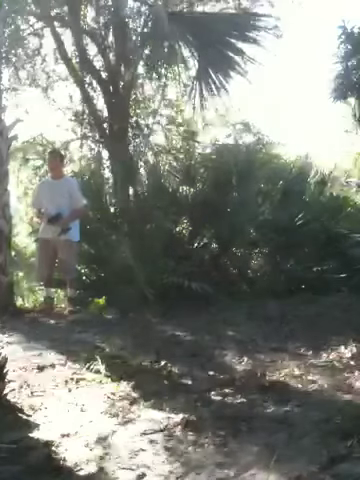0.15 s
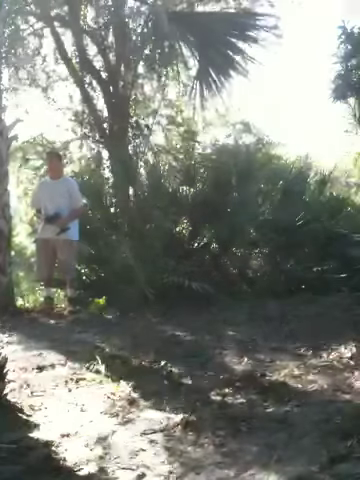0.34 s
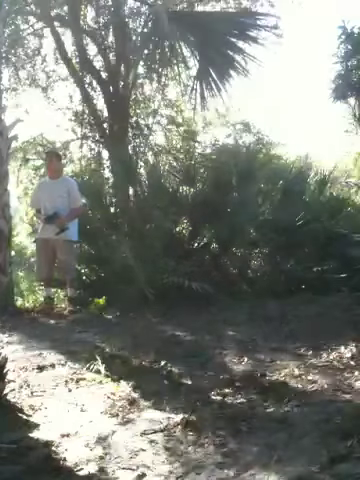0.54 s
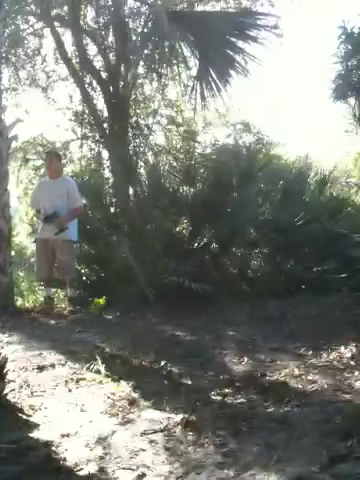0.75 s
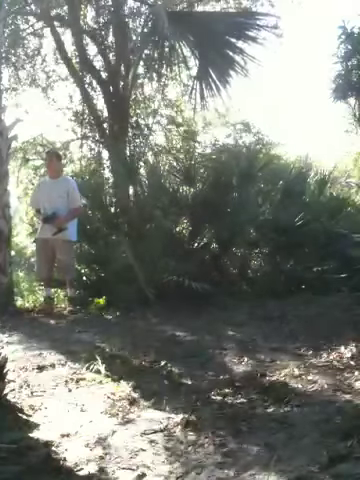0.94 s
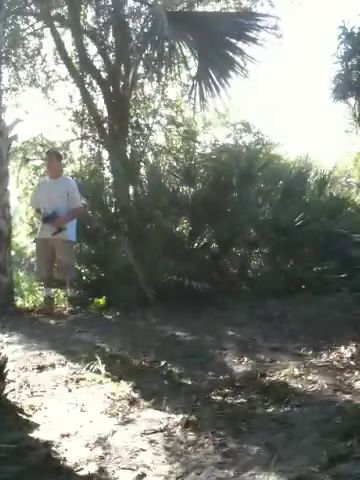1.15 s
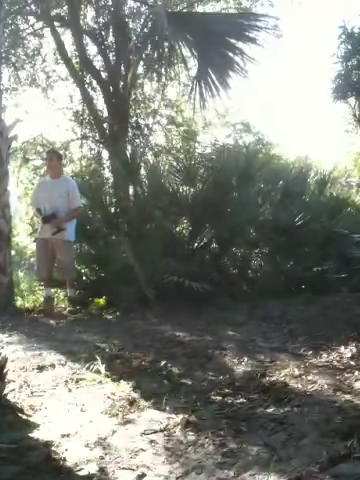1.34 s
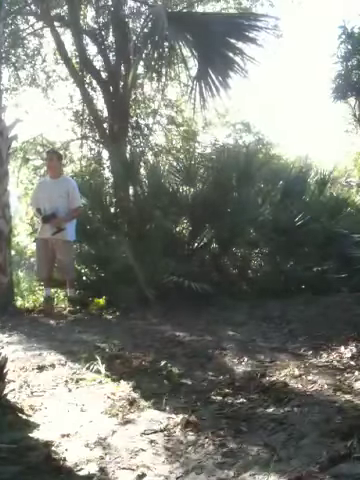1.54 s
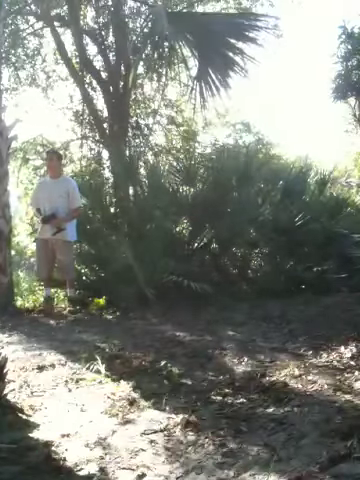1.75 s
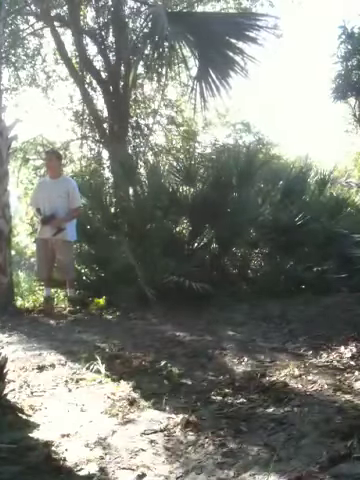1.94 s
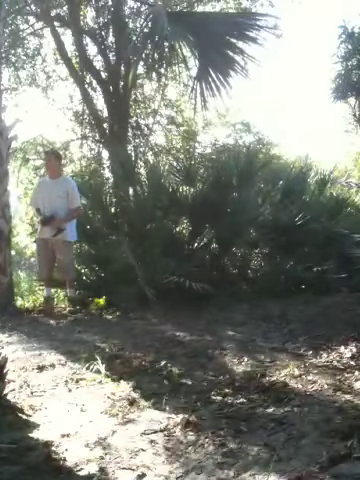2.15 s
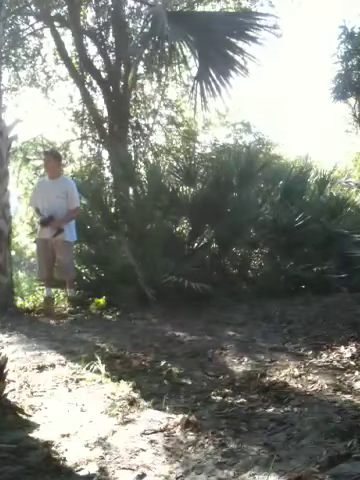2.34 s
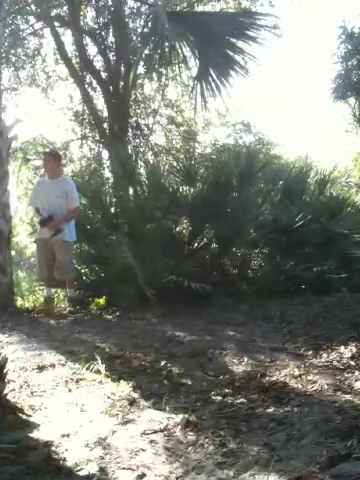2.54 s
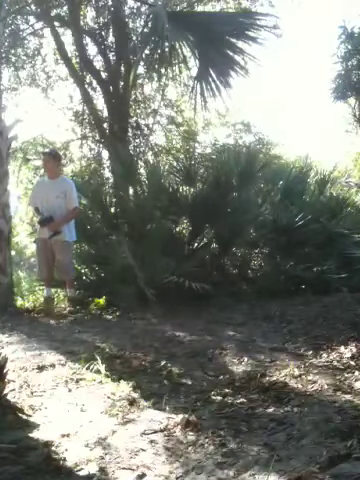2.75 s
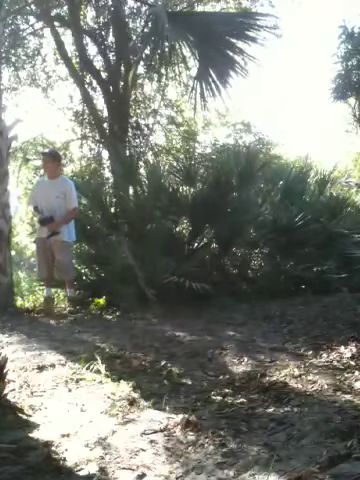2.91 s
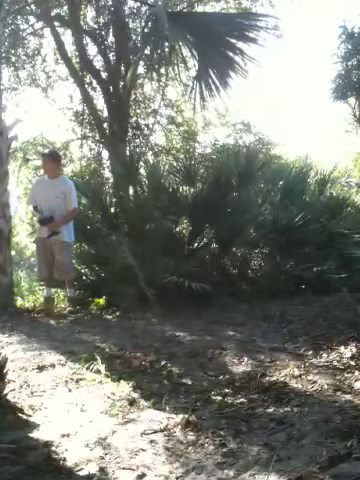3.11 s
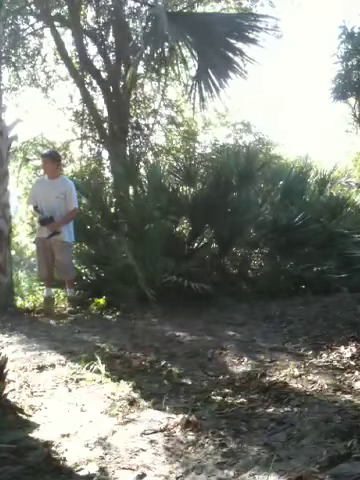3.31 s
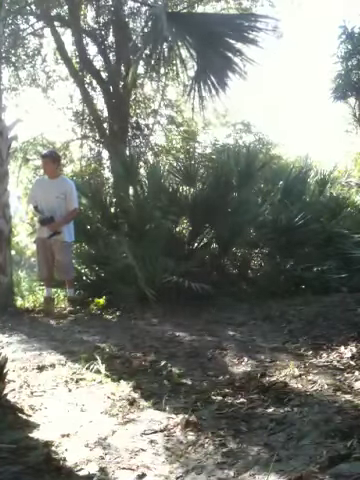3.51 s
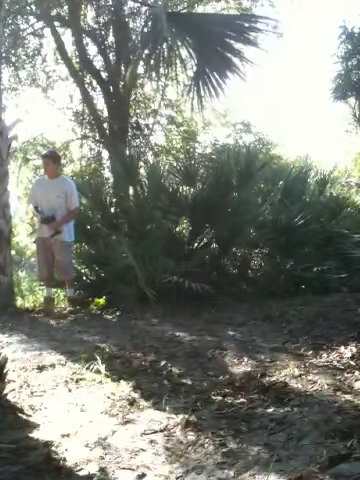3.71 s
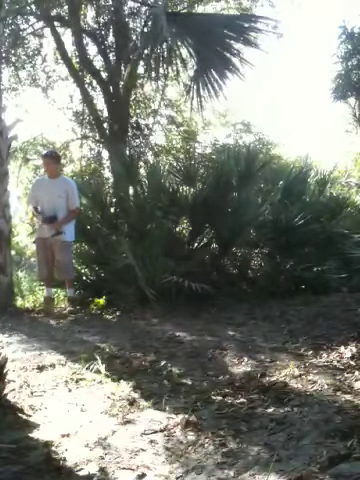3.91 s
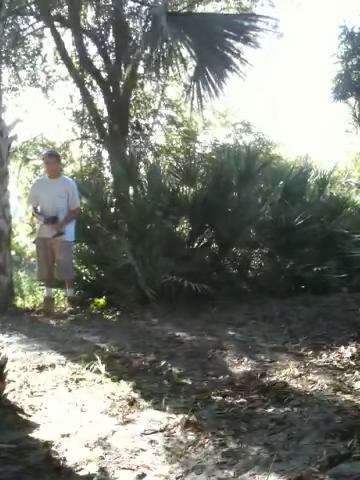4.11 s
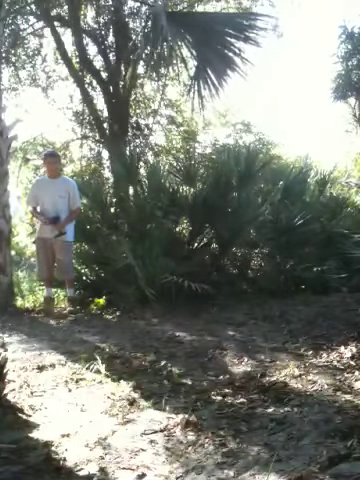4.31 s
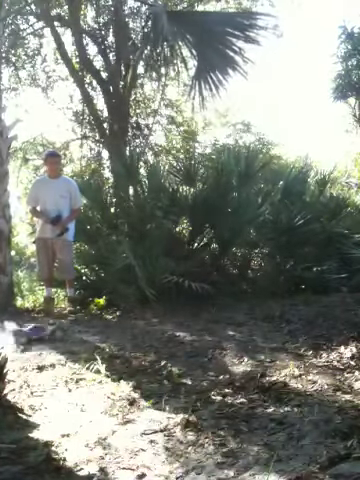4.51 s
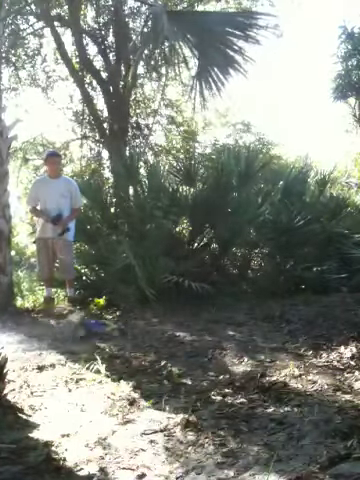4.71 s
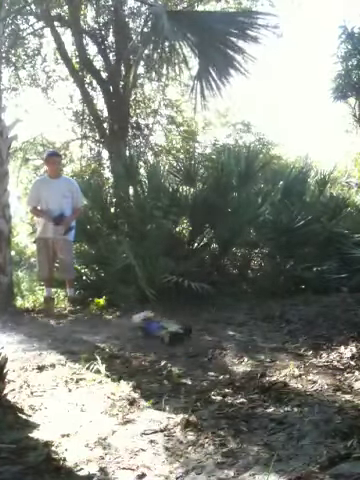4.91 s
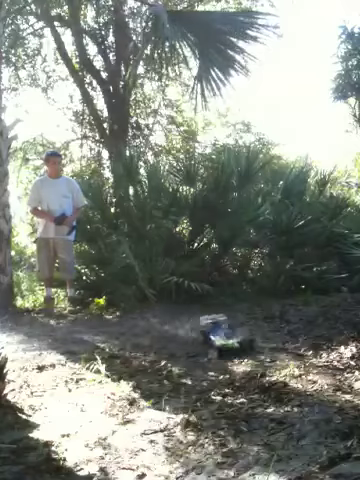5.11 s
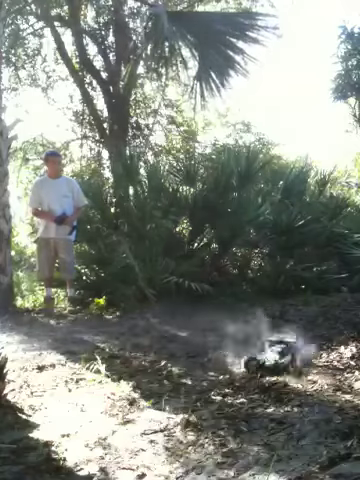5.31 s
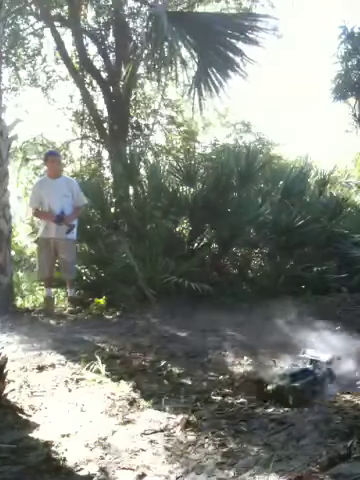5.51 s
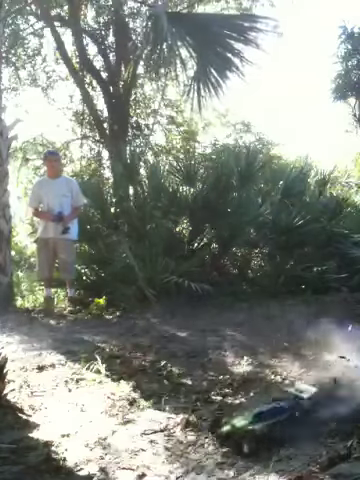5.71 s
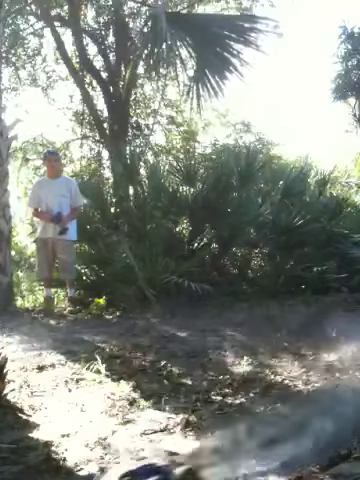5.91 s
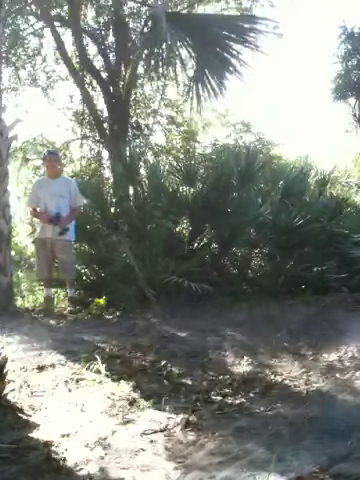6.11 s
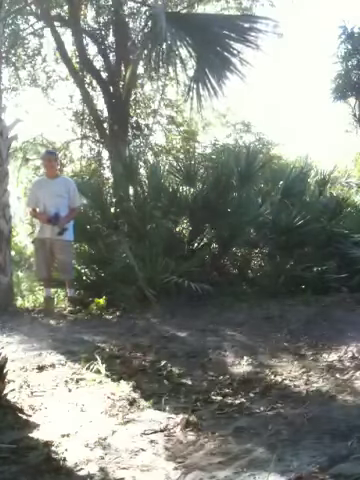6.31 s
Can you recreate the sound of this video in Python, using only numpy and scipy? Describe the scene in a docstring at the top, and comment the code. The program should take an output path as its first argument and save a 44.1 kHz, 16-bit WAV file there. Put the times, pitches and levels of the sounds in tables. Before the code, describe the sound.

Raspy, high-pitched whine of a small fuel-powered toy car, blipping up and down over a rough burble, with faint tyre scrabble on dirt.

```python
"""A dirt yard ringed by bushes: a nitro model buggy drives round on throttle blips over an uneven cruise.
Each blip swings the engine above its cruising speed, and every part of the exhaust grows with that effort.
Each firing of its tiny two-stroke sends a pressure pulse and a spurt of gas through the tuned pipe,
which rings at a low, a middle and a high resonance. Tyres scrabble faintly below.
The loudest revs overload a small microphone, alike in both channels."""
import sys
import numpy as np
from scipy import signal
from scipy.fft import rfft, irfft
from scipy.io import wavfile
from scipy.ndimage import uniform_filter1d

SR = 44100
rng = np.random.default_rng(int(sys.argv[2]) if len(sys.argv) > 2 else 0)


def pcm_store(signal):
    """Save signal as 16-bit PCM."""
    levels = np.round(np.clip(np.atleast_2d(signal), -1, 1) * 32767)
    wavfile.write(sys.argv[1], SR, levels.astype(np.int16).T)


N = 280035

# running state: (time [s], roughness of firing before load steadies it [factor],
# low pipe resonance before load and waver [Hz], mean level of the tyres [dB])
RUNNING = [(0, 0.9, 1692, -31.5), (2.4, 1.08, 1669, -37.5), (2.75, 0.64, 1644, -40.5),
           (3.25, 0.96, 1606, -31), (3.45, 0.4, 1687, -43.5), (5.45, 0.32, 1618, -36.5),
           (5.95, 0.69, 1728, -25.5), (6.22, 0.83, 1469, -35.5), (6.35, 0.3, 1623, -29)]


def engine():
    """Firings drive the low orders, the bark, the pipe and the rasp; all grow with effort."""
    # drive and turns: (time [s], level of the whole exhaust [dB], level of its treble [dB])
    path = [(0.0, 6, -1.4), (0.34, 0, 3.4), (0.61, 1.5, 3), (1.0, 3.5, 1), (1.36, -3.4, 6), (1.56, 3, 1.5),
            (1.73, 0, 0.5), (2.02, 1, 0.4), (2.36, -2.5, 4), (3.27, -3.7, -2.5), (3.5, -6.5, -2),
            (3.65, 0.6, -5.5), (3.84, -1, -4), (4.79, -2, -2.5), (5.1, 2.5, -6), (5.49, -4, 5),
            (5.95, 1, 3), (6.35, 6.5, -6.5)]
    whole_db, treble_db = in_time(path)
    hz = speed()
    effort = effort_at(hz)

    # load is read from the revs: under load the burn is steadier
    load = np.clip((hz - 215) / 55, 0, 1)
    rough = in_time(RUNNING)[0] * (1 - 0.78 * load)
    turns = np.cumsum(hz * (1 + 0.00986 * rough * drift(70))) / SR
    pulses, strength = firings(turns, uneven_db=1.6 + 0.82 * rough, jitter_s=0.000006 + 0.00005 * rough)
    gas = spurts(turns, strength, open_share=1.0, leak=0.19)
    hiss = rough * gas

    tone = low_orders(turns, hz, effort, strength)
    tone = tone + bark(pulses, hiss, hz, effort, treble_db)
    tone = tone + pipe(pulses, hiss, load, effort, treble_db)
    rasp_db = level(effort, usual_db=-21, db_per_octave=24) + whole_db + treble_db
    exhaust = from_db(whole_db) * tone + rasp(gas, rasp_db)

    # off the throttle the level burbles, as firings come in lumps
    burble_db, burbles_per_s = 1.48, 83
    return from_db(burble_db * rough * drift(burbles_per_s)) * exhaust


def speed():
    """Firings per second: each blip swings the engine up from its cruising speed and lets it run down."""
    # held throttle: (time [s], speed between blips [firings/s])
    cruise = [(-0.003, 194.0), (1.315, 211.0), (1.733, 191.0), (1.886, 230.0), (2.13, 232.0),
              (2.484, 209.0), (2.727, 245.0), (3.164, 247.0), (3.434, 172.0), (3.786, 223.0),
              (4.344, 236.0), (4.815, 219.0), (5.221, 251.0), (5.365, 290.0), (5.573, 302.0),
              (5.729, 327.0), (5.985, 278.0), (6.164, 180.0)]
    # throttle blips: (time of the peak [s], extra speed [firings/s], rise [s], fall [s])
    blips = [(0.175, 141.0, 0.083, 0.097), (0.568, 129.0, 0.092, 0.072), (0.816, 78.0, 0.087, 0.122),
             (1.051, 79.0, 0.057, 0.084), (1.551, 83.0, 0.074, 0.119), (2.043, 34.0, 0.079, 0.05),
             (3.196, 29.0, 0.023, 0.124), (3.663, 66.0, 0.084, 0.095), (4.449, 47.0, 0.09, 0.096),
             (4.964, 75.0, 0.063, 0.07), (5.27, 28.0, 0.029, 0.097), (5.89, 54.0, 0.065, 0.127)]
    hz, = in_time(cruise)
    t = np.arange(N) / SR
    for peak_s, extra_hz, rise_s, fall_s in blips:
        away = (t - peak_s) / np.where(t < peak_s, rise_s, fall_s)
        hz = hz + extra_hz * np.exp(-np.minimum(away ** 2, 20))
    return hz


def effort_at(hz, usual_hz=250, full_power_hz=292.3):
    """Effort in octaves of speed above the usual, with a soft ceiling at full power."""
    capped = hz / (1 + (hz / full_power_hz) ** 16) ** (1 / 16)
    return np.log2(capped / usual_hz)


def level(effort, usual_db, db_per_octave):
    """Decibels that effort gives one part of the exhaust, usual_db being its level at the usual speed."""
    return usual_db + db_per_octave * effort


def firings(turns, uneven_db, jitter_s):
    """One pulse a turn, each a little off in strength and time; also the strength held through the turn."""
    count = np.floor(turns).astype(int)
    at = np.flatnonzero(np.diff(count))
    chance = rng.standard_normal((N, 2))[:len(at)]
    strength = from_db(uneven_db[at] * np.minimum(chance[:, 0], 2))
    crossing = np.interp(count[at + 1], turns, np.arange(N))
    exact = crossing + jitter_s[at] * SR * chance[:, 1]
    # a short sinc places each pulse between samples
    pulses = np.zeros(N)
    for tap in range(-3, 5):
        index = np.clip(exact.astype(int) + tap, 0, N - 1)
        pulses[index] += strength * np.sinc(index - exact)
    held = strength[np.clip(count - 1, 0, len(at) - 1)]
    return even(pulses), held


def spurts(turns, strength, open_share, leak):
    """Turbulent gas bursts out as the exhaust port opens and weakens through the turn, over a steady leak."""
    burst = np.exp(-(turns % 1) / open_share)
    return even(rng.standard_normal(N) * strength * (leak + burst))


def low_orders(turns, hz, effort, strength):
    """The firing tone and its octave, swelling with the strength of the firings."""
    # firing tone against the rest: (time [s], level [dB])
    first_fade = [(0.0, -2.5), (0.12, 8), (0.6, 6), (0.98, 5.5), (1.42, 2.8), (1.58, 16.5), (1.72, -6.5),
                  (1.94, 2.5), (2.01, -3.5), (2.82, 7), (3.23, -10), (3.43, -2.5), (3.86, 0.3), (4.87, 2),
                  (5.1, -7), (5.45, 6), (6.01, 4.7), (6.35, -6)]
    # its octave against the rest: (time [s], level [dB])
    second_fade = [(0.0, -3), (0.15, 2.0), (0.2, -9.9), (0.51, 9.5), (0.57, -1.5), (1.0, 3.4), (1.22, -2.5),
                   (1.74, -0.7), (2.7, 7.5), (2.82, -2.5), (3.27, 11), (3.41, -24), (3.59, 7), (3.88, -12),
                   (4.12, 1), (5.1, 10.5), (5.79, 4), (6.35, -11.5)]
    first_db, = in_time(first_fade)
    second_db, = in_time(second_fade)
    first_db = first_db + level(effort, usual_db=-28, db_per_octave=21.7)
    second_db = second_db + level(effort, usual_db=-33.5, db_per_octave=13.6)

    # the firing tone hollows out as it sweeps through one pitch
    hollow_hz, hollow_width_hz, hollow_db = 276.3, 21, 14.5
    dip_db = hollow_db / (1 + ((hz - hollow_hz) / hollow_width_hz) ** 2)
    first = from_db(first_db - dip_db) * np.sin(2 * np.pi * turns)
    second = from_db(second_db) * np.cos(4 * np.pi * turns)
    swell = even(uniform_filter1d(strength, size=400))
    return np.sqrt(2) * swell * (first + second)


def bark(pulses, hiss, hz, effort, treble_db):
    """The pressure pulse itself, harder while the engine picks up, and the snarl of its steep front."""
    # colour of the exhaust pulse: (frequency [Hz], level [dB])
    bark_colour = [(380, -39.5), (520, -1.5), (800, 4), (1000, 1), (1200, 4), (1400, 1), (6000, -41)]
    # colour of its steep front: (frequency [Hz], level [dB])
    snarl_colour = [(1100, -23.5), (2200, 9), (2550, 3.5), (3200, -1), (4000, -6.5), (5500, -20.5)]
    # bark against the rest: (time [s], level [dB])
    bark_fade = [(0, -7), (0.2, 2), (0.62, -1.5), (0.8, 0), (1.25, -4), (1.52, 0.5), (1.72, -6.5), (2.0, 1),
                 (2.5, -2), (3.25, 3.5), (3.8, -4.5), (4.3, 2.5), (4.47, -6.5), (4.62, -1), (5.5, 2),
                 (5.97, 2.5), (6.06, -5), (6.35, -1)]
    # snarl against the rest: (time [s], level [dB])
    snarl_fade = [(0, -0.5), (0.7, 2), (1.3, 5.5), (1.75, 2), (2.05, -0.5), (2.75, -4.5), (3.4, -6),
                  (4.1, -2), (4.75, 5), (5.0, -2), (5.72, -1), (5.95, 4.5), (6.2, 9), (6.35, 6)]
    bark_db, = in_time(bark_fade)
    snarl_db, = in_time(snarl_fade)

    # the surge is in full from this acceleration on
    surge_db, full_surge_hz_per_s = 3, 1400
    surge = np.clip(np.gradient(hz) * SR / full_surge_hz_per_s, 0, 1)
    bark_db = bark_db + level(effort, usual_db=-27.5, db_per_octave=12.4) + surge_db * surge
    snarl_db = snarl_db + level(effort, usual_db=-31.5, db_per_octave=29) + treble_db

    body = even(yard(colour(pulses + 0.058 * hiss, bark_colour), scatter_db=3.5))
    front = even(yard(colour(pulses + 0.55 * hiss, snarl_colour), scatter_db=-3))
    return from_db(bark_db) * body + from_db(snarl_db) * front


def pipe(pulses, hiss, load, effort, treble_db):
    """Three resonances of the tuned pipe; hotter gas under load raises the low and the high one."""
    # how far they stand out: (time [s], low resonance [dB], middle and high resonances [dB])
    ringing = [(0.0, -0.8, -0.2), (0.54, 0.7, 5.5), (0.87, -2.5, 3.5), (1.35, 7.4, 2.5), (1.53, -1.5, 0),
               (2.07, -2.5, 1.3), (2.48, 5, 2.5), (2.65, -4, -5), (3.07, 1.5, -10), (4.11, -10, -0.5),
               (4.39, -2.7, -18), (4.48, -8.5, -1), (4.97, -0.5, -7), (5.75, 1.5, 3), (5.89, 13, 3.5),
               (6.07, -1.3, 1), (6.35, -1.5, 7.8)]
    # middle resonance against the rest: (time [s], level [dB])
    middle_fade = [(0, -4), (0.5, 1.5), (1.4, 1), (2.2, 3.5), (3.1, 0), (3.7, -4), (4.3, -9), (5.15, 10.5),
                   (5.35, -5.5), (6.35, -13)]
    low_db, high_db = in_time(ringing)
    middle_db, = in_time(middle_fade)
    low_db = low_db + level(effort, usual_db=-22.5, db_per_octave=14.2)
    middle_db = middle_db + high_db + treble_db + level(effort, usual_db=-36, db_per_octave=22.5)
    high_db = high_db + treble_db + level(effort, usual_db=-25, db_per_octave=20.4)

    # off the throttle the low resonance wavers from one lump of firings to the next
    waver_hz, wavers_per_s = 32, 52
    roughness, low_hz, _ = in_time(RUNNING)
    low_hz = low_hz + waver_hz * roughness * (1 - load) * drift(wavers_per_s) + 70 * load
    middle_hz = np.full(N, 3745)
    high_hz = 6550 + 330 * load

    low = resonate(pulses + 0.78 * hiss, low_hz, width_hz=59, skirt_hz=910)
    middle = resonate(pulses + 0.15 * hiss, middle_hz, width_hz=370, skirt_hz=1100)
    high = resonate(pulses + 2 * hiss, high_hz, width_hz=190, skirt_hz=1340)
    low_ring = from_db(low_db) * even(yard(low, scatter_db=0))
    middle_ring = from_db(middle_db) * even(yard(middle, scatter_db=3))
    high_ring = from_db(high_db) * even(yard(high, scatter_db=-3))
    return low_ring + middle_ring + high_ring


def rasp(gas, rasp_db):
    """The escaping gas; a stronger jet is also a brighter one and throws a fine spray on top."""
    # colour of the escaping gas: (frequency [Hz], level [dB])
    rasp_colour = [(1000, -22.5), (3200, -4.5), (3900, -1.5), (5100, -13), (6200, 0.5), (7400, 1),
                   (8200, 5), (8900, -4), (9700, -4), (11200, -11), (15500, -34)]
    # colour of the spray: (frequency [Hz], level [dB])
    spray_colour = [(7000, -54), (10500, 18), (12500, 12.5), (15500, -30.5)]
    # spray_db is the spray beside a rasp of usual_db; spray_growth is dB gained per dB of rasp
    usual_db, spray_db, spray_growth = -22, -44, 2.5
    excess_db = rasp_db - usual_db
    # the difference from sample to sample is a brighter copy of the gas
    jet = gas + from_db(excess_db - 2.5) * np.diff(gas, prepend=0)
    spray = from_db(spray_db + spray_growth * excess_db) * even(colour(gas, spray_colour))
    return from_db(rasp_db) * even(yard(colour(jet, rasp_colour), scatter_db=6)) + spray


def tyres():
    """Knobbly tyres scrabble over dirt and leaves: coloured noise with a fluttering level."""
    # colour of the scrabble: (frequency [Hz], level [dB])
    tyre_colour = [(120, -37), (230, -18.5), (600, -15), (4000, -31)]
    tyres_db = in_time(RUNNING)[-1] + 2 * drift(40)
    return even(colour(rng.standard_normal(N), tyre_colour)) * from_db(tyres_db)


def yard(x, scatter_db, t60=0.11, ground_lag_s=0.000438, changes_hz=9):
    """A ground bounce hollows the tone; trunks and fronds add short echoes that keep shifting."""
    # bounce off the bare ground: (time [s], strength [share of the direct sound])
    ground = [(4.2, 0.15), (4.5, 0.15), (5.0, 0.46), (5.45, 0.54), (5.9, 0.15)]
    bounce, = in_time(ground)
    samples = np.arange(N)
    direct = x + bounce * np.interp(samples - ground_lag_s * SR, samples, x)
    t = np.arange(SR // 4) / SR
    echoes = rng.standard_normal((2, len(t))) * from_db(-60 * t / t60)
    echoes = echoes / np.linalg.norm(echoes[0])
    here, there = signal.fftconvolve(direct[None], echoes)[:, :N]
    # a wandering angle turns between two sets of echoes
    place = 2 * np.pi * drift(changes_hz / 2) / 2
    return direct + from_db(scatter_db) * (here * np.cos(place) + there * np.sin(place))


def resonate(x, centre_hz, width_hz, skirt_hz):
    """A resonance with a moving centre and steepened skirts: shift to zero, smooth twice, shift back."""
    turn = np.exp(2j * np.pi * np.cumsum(centre_hz) / SR)
    x = x / turn
    for width in (width_hz, skirt_hz):
        r = np.exp(-np.pi * width / SR)
        x = signal.lfilter([1 - r], [1, -r], x)
    return (x * turn).real


def colour(x, points):
    """Causal (minimum-phase) filter with the given spectrum."""
    size = 4096
    hz, db = np.transpose(points)
    grid = np.maximum(np.arange(size // 2 + 1) * SR / size, 1)
    gain = from_db(np.interp(np.log(grid), np.log(hz), db))
    # folding the cepstrum forward gives the minimum phase
    cepstrum = irfft(np.log(gain))
    cepstrum[1:size // 2] *= 2
    cepstrum[size // 2 + 1:] = 0
    return signal.fftconvolve(x, irfft(np.exp(rfft(cepstrum))))[:N]


def even(x):
    """Hold the rms near 1 over a few hundredths of a second."""
    power = uniform_filter1d(uniform_filter1d(x * x, size=1800), size=1800)
    return x / np.sqrt(np.maximum(power, 1e-18))


def drift(rate):
    """Random wander: straight lines between unit-spread normal draws, rate draws per second."""
    knots = rng.standard_normal(4000)
    return np.interp(np.arange(N) / SR * rate, np.arange(len(knots)), knots)


def in_time(rows):
    """Each column of a curve at every sample."""
    s, *columns = np.transpose(rows)
    return [np.interp(np.arange(N) / SR, s, c) for c in columns]


def from_db(db):
    """Decibels to gain."""
    return 10 ** (np.asarray(db) / 20)


def scene():
    """The buggy's engine and tyres, alike in both channels."""
    return np.tile(engine() + tyres(), (2, 1))


def record(dry, low_cut_hz=130, ceiling=0.72, hardness=12.0, cutoff_hz=15700):
    """The microphone drops the bass and flattens the loudest peaks; the top is cut."""
    low_cut = signal.butter(4, low_cut_hz, "high", fs=SR, output="sos")
    thin = signal.sosfilt(low_cut, dry)
    clipped = thin / (1 + np.abs(thin / ceiling) ** hardness) ** (1 / hardness)
    top_cut = signal.firwin(601, cutoff_hz, window="blackman", fs=SR)
    return signal.fftconvolve(clipped, top_cut[None], mode="same")


dry = scene()
out = record(dry)
pcm_store(out)
```